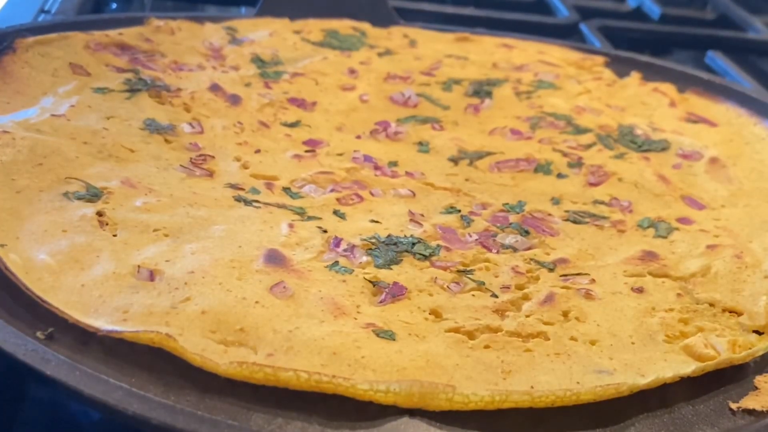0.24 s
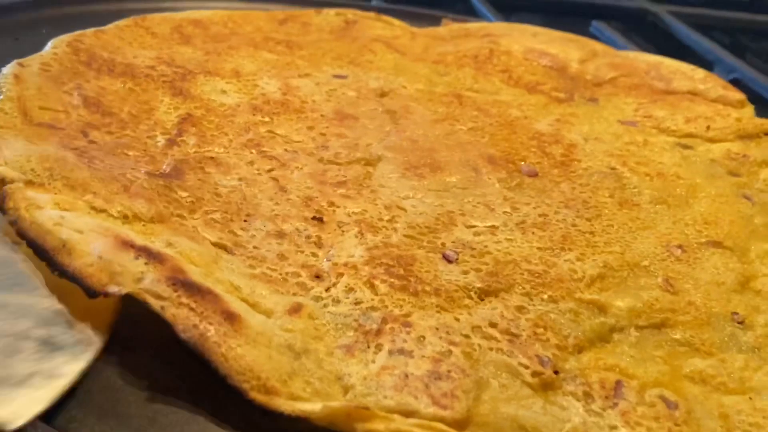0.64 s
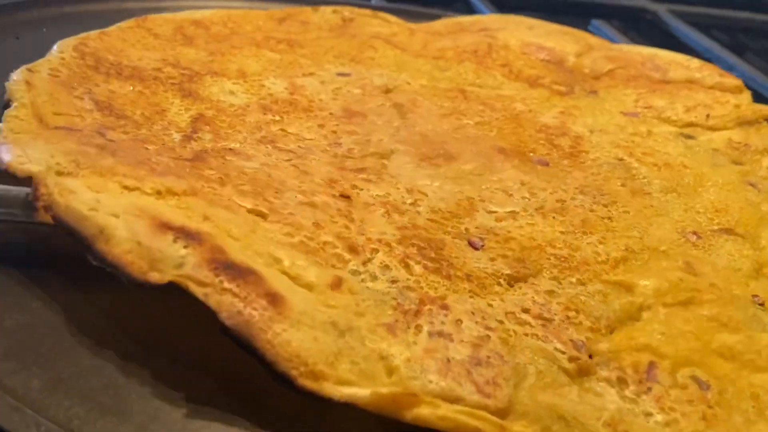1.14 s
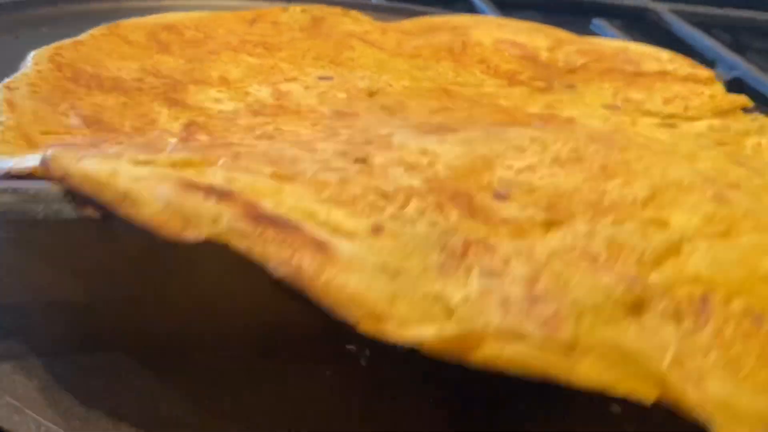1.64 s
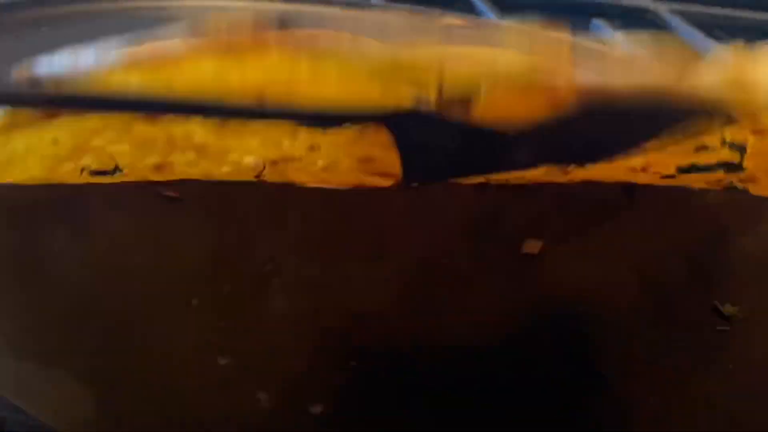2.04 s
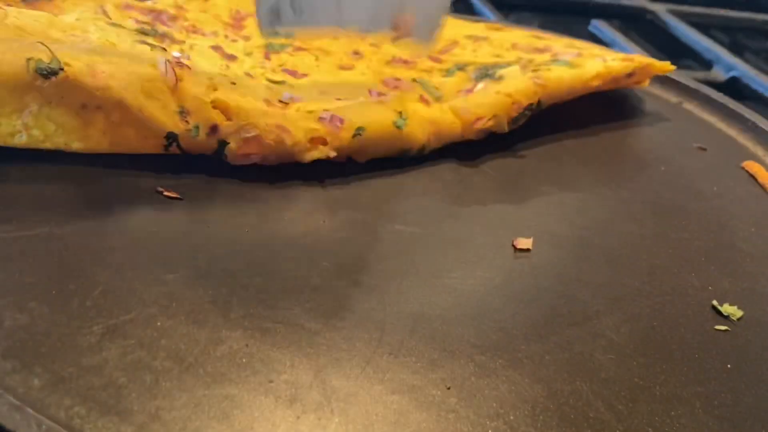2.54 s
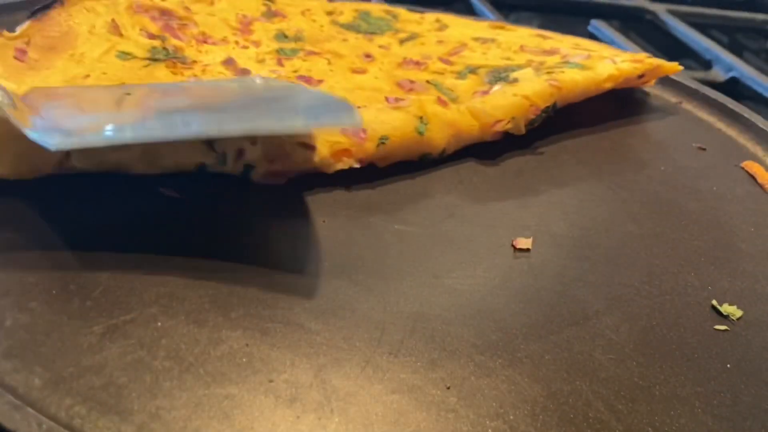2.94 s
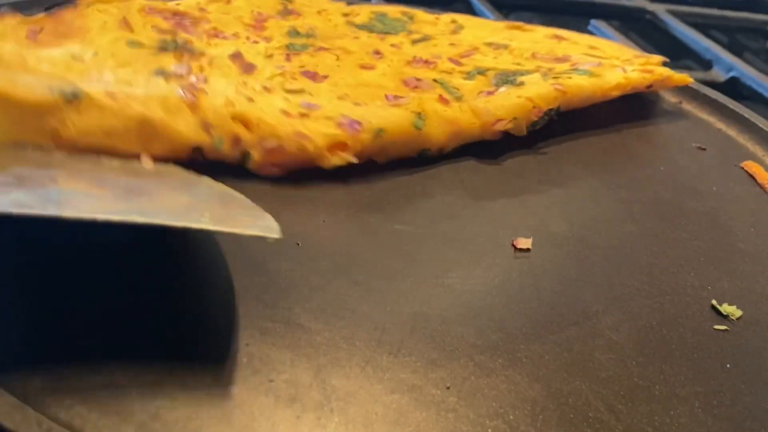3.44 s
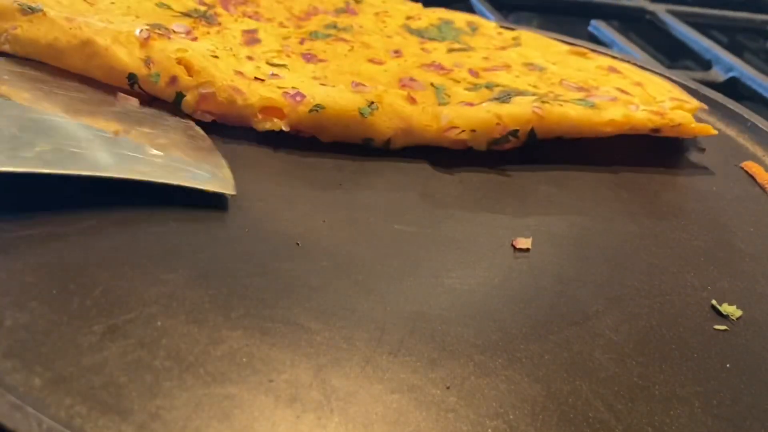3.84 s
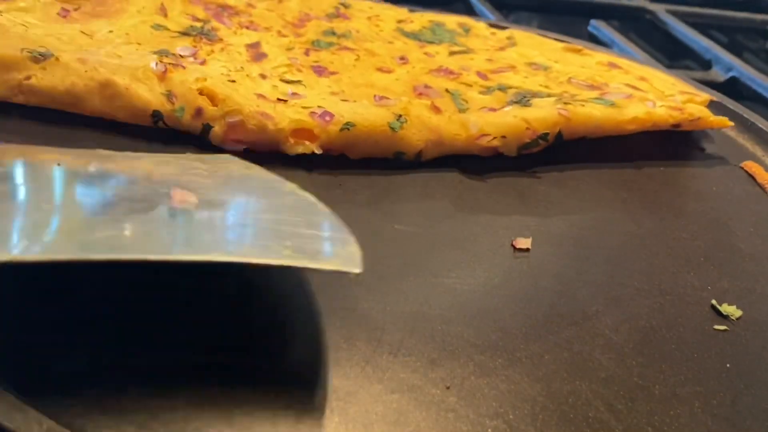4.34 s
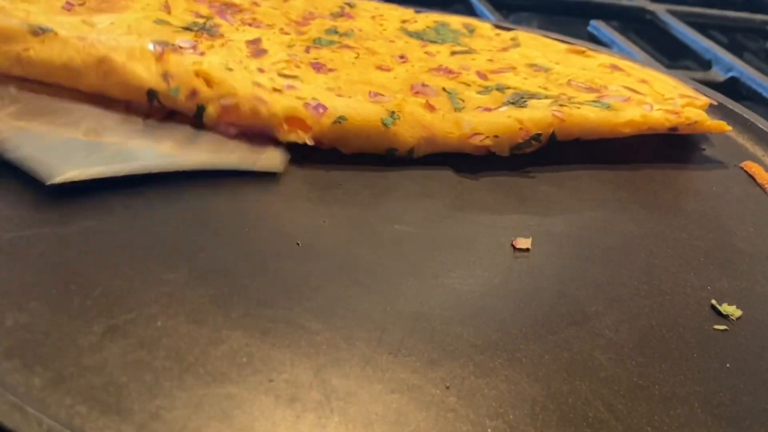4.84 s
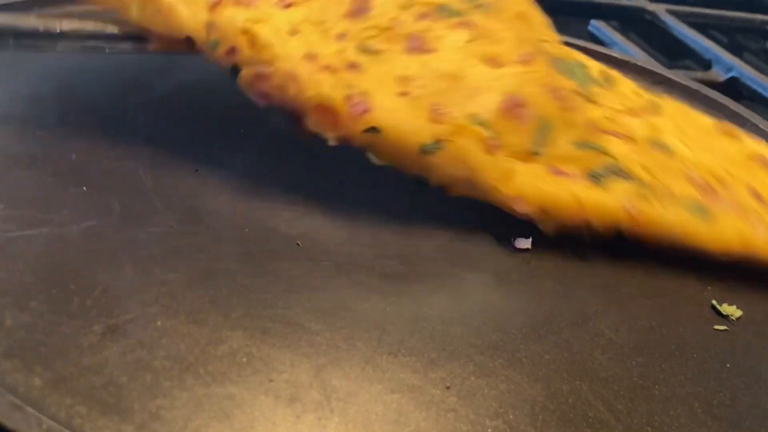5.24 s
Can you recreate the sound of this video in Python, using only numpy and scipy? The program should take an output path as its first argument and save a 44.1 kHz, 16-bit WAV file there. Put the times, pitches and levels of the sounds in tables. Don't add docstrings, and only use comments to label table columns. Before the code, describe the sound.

A low kitchen rumble with fan hum and airy flame hiss opens the scene, then a dull handling bump and crisp crackly snaps. A steel spatula scrapes under a flatbread on a flat pan, ticking lightly. A brief squeal follows a hard ringing slap past the middle; a second, drier slap leads into busy scraping. Close stereo phone-like microphone, small dry kitchen.

```python
import sys
import numpy as np
from scipy import signal
from scipy.fft import rfft, irfft, next_fast_len
from scipy.io import wavfile
from scipy.ndimage import uniform_filter1d

SR = 44100
rng = np.random.default_rng(int(sys.argv[2]) if len(sys.argv) > 2 else 0)


def int16_out(signal):
    q = np.round(np.clip(np.atleast_2d(signal).T, -1, 1) * 32767)
    wavfile.write(sys.argv[1], SR, q.astype(np.int16))


def gain_from_db(level_db):
    decades = np.asarray(level_db, float) / 20
    return 10 ** decades


N = 242550

# (frequency [Hz], level [dB per Hz])
RUMBLE_COLOUR = [(27.5, -29), (31.5, -3.5), (40, -1.5), (50, -2), (100, -3), (140, -12.5), (200, -41.5)]
# (time [s], half width [s], change [dB])
RUMBLE_SURGES = [
    (.44, 0.029, -0.5),
    (.64, 0.053, 14),
    (.8, 0.2, -21),
    (1.15, 0.12, 0),
    (1.399, 0.18, 4.5),
    (2.358, 0.045, 6.5),
    (2.9, 0.056, 3),
    (4.01, 0.022, -12),
    (5.35, 0.096, -4),
]
# (frequency [Hz], level [dB per Hz])
AIR_COLOUR = [(80, -17.5), (130, -3.5), (250, -7.5), (340, -9), (420, -8.5), (600, -20), (800, -24.5),
              (1000, -27.5), (2000, -39), (4000, -67), (7500, -37), (9000, -27.5), (12000, -43.5),
              (16000, -67)]
# (frequency [Hz], width [Hz], level [dB])
FAN_TONES = [(38, 5, -46), (164, 7, -52), (327, 6, -55.5), (355, 3, -56.5), (436, 8, -66), (102, 12, -51)]
# (time [s], half width [s], depth [dB])
SCENE_CHANGE = (0.359, 0.011, -26)

# (time [s], level [dB])
JOLT = [
    (0.365, -57),
    (0.371, -39),
    (.385, -26),
    (.397, -30),
    (0.42, -22.5),
    (.442, -29.5),
    (0.473, -42),
    (0.5, -27.5),
    (0.535, -50),
]
# (frequency [Hz], level [dB per Hz])
SHAKE_COLOUR = [(60, -0.5), (120, 1.0), (300, -12), (450, -13.0), (600, -40), (1000, -37), (1500, -54.5)]
# (time [s], level [dB], frequency [Hz], half length [s])
KNOCK = (.4115, -19, 255, .0026)

# (time [s], peak [dB], centre [Hz])
SNAPS = [(.5095, -22, 5000), (.5152, -22, 6500), (.5627, -17.5, 6000), (.5838, -24, 5500),
         (1.5015, -42, 7000), (1.5992, -33, 3000), (1.5992, -33, 6800), (1.4215, -38, 7500),
         (2.2524, -28, 3500), (2.2855, -27, 3000), (2.7515, -29, 2500), (2.7895, -30, 4000),
         (.7245, -35, 5500), (1.6062, -36, 6500), (.6815, -31, 7000), (.7357, -29, 5000),
         (4.6926, -34, 4000), (5.0735, -42, 6000), (5.0765, -40, 7000)]
# (time [s], length [s], from [Hz], to [Hz], level [dB])
GLIDES = [
    (0.61, 0.067, 800, 1020, -44),
    (4.72, 0.21, 630, 1410, -52),
    (4.8, 0.11, 5300, 4600, -48),
    (5.1, 0.061, 830, 480, -60),
    (4.797, 0.2, 2590, 2800, -55),
]
# (time [s], frequency [Hz], level [dB])
SQUEAL = [
    (3.32, 1366, -61),
    (3.37, 1361, -46),
    (3.395, 1360, -49),
    (3.41, 1362, -41),
    (3.43, 1370, -39),
    (3.452, 1386, -32.5),
    (3.462, 1386, -35),
    (3.469, 1380, -45),
    (3.481, 1375, -39),
    (3.492, 1370, -56),
]
# (time [s], length [s], frequency [Hz], level [dB])
SINGS = [(.43, .1, 720, -52), (.59, .12, 725, -47), (.61, .05, 1370, -51), (.635, .014, 3210, -41),
         (.645, .04, 920, -52), (.85, .04, 4850, -48), (1.15, .1, 915, -57), (1.33, .07, 720, -50),
         (1.44, .09, 722, -59), (1.655, .015, 920, -51), (1.662, .015, 1300, -56), (2.305, .04, 2170, -46),
         (2.32, .06, 1400, -49), (3.542, .012, 4830, -45), (3.87, .06, 4840, -53), (3.875, .025, 2980, -47),
         (3.877, .018, 1745, -49), (3.872, .02, 3830, -50), (3.878, .02, 7110, -49),
         (3.935, .04, 3230, -51), (3.98, .12, 2480, -62), (3.89, .06, 1378, -54), (4.755, .04, 4060, -46),
         (4.74, .06, 2990, -47), (4.78, .1, 715, -48), (4.815, .025, 921, -42), (4.88, .04, 1950, -49),
         (4.94, .07, 1400, -50), (1.14, .08, 715, -58), (2.43, .08, 730, -59), (2.6, .12, 738, -63),
         (3.95, .1, 725, -61), (4.2, .16, 733, -63), (4.23, .04, 1030, -61), (4.22, .05, 1380, -61),
         (5.05, .06, 690, -56), (5.27, .04, 1180, -58), (4.89, .04, 1050, -48)]
# (time [s], length [s], frequency [Hz], level [dB])
CATCHES = [(0.524, 0.031, 3300, -49), (0.54, 0.022, 6640, -49), (0.59, .05, 4062, -51),
           (0.575, 0.044, 3300, -52), (0.56, .03, 7016, -58), (.625, 0.064, 1500, -50),
           (0.824, 0.063, 910, -54), (0.813, 0.027, 1380, -48), (.82, 0.059, 2100, -50),
           (0.827, .03, 2690, -51), (0.897, .03, 1850, -47), (.96, 0.035, 3600, -50),
           (0.997, .05, 715, -60), (1.284, 0.062, 925, -54), (2.29, .03, 700, -49.5),
           (2.318, 0.033, 95, -29), (2.335, .025, 91, -30), (2.382, .03, 113.4, -34.5),
           (3.375, .05, 1700, -43), (3.376, 0.039, 3821, -51), (3.381, .05, 2597, -49),
           (3.43, .04, 3200, -52), (3.43, 0.055, 3819, -48.5), (3.455, 0.031, 2780, -46),
           (3.46, 0.043, 3010, -50), (3.455, .03, 2800, -50), (3.45, .03, 5600, -50),
           (3.466, 0.046, 680, -50), (3.543, 0.036, 2700, -55), (3.87, .04, 5900, -60),
           (3.875, 0.035, 2482, -55), (3.87, .03, 3198, -54), (3.92, .06, 4510, -58),
           (3.935, .04, 1774, -58), (3.912, 0.085, 1020, -62.5), (4.727, 0.042, 1750, -48),
           (4.71, 0.038, 2800, -52.5), (4.73, 0.052, 3869, -45), (4.72, 0.033, 6812, -56),
           (4.748, 0.034, 3600, -48), (4.758, .04, 6575, -52), (4.761, .05, 7068, -53),
           (4.874, 0.063, 740, -47), (4.883, 0.032, 2476, -49), (4.89, 0.038, 2664, -47),
           (4.873, 0.026, 3283, -45), (4.86, 0.074, 4900, -54), (4.909, .035, 4200, -47),
           (4.914, 0.036, 4581, -49.5), (5.003, .02, 1410, -53)]

# (time [s], ring level [dB])
RUNG_TAPS = [
    (1.2620, -37),
    (2.2860, -33),
    (1.5180, -51),
]
# (frequency [Hz], level [dB], t60 [s])
EDGE_RING = [(710, -4, 0.16), (1090, -11, 0.16), (1220, -9, .1), (1530, -10, 0.18), (2255, 2.5, 0.065),
             (2500, -4, .087), (2670, -11, .06), (3100, -14, 0.13), (3550, -16, .1)]
PRESS_RING = [(694, -6, 0.075), (960, -11, .12), (1380, -18, 0.22), (2166, 1, .08), (2480, -3.5, 0.12),
              (3306, -15, .05), (3730, -12, .05), (4400, -27, .05)]
TICK_RING = [(1720, 1, .13), (2420, -3, .04), (2950, -4, .05), (4050, -3, .05), (4447, -3, .09),
             (5566, 1, .1), (6638, 4, .05), (7600, -6, .03)]
# (time [s], peak [dB], centre [Hz], rattle t60 [s], spread [octaves])
TAPS = [(0.5095, -35, 5550, 0.034, 1.7), (0.5169, -28.5, 6070, 0.08, 0.68), (1.2595, -30, 2020, 0.23, 1.3),
        (1.4122, -43, 7200, 0.014, 0.7), (1.4215, -46, 6000, 0.034, 0.64), (1.518, -36.5, 4000, 0.11, 2.1),
        (2.037, -35, 4900, 0.014, 2.3), (2.11, -54, 7100, .05, 0.96), (2.148, -35.5, 2500, 0.2, 0.79),
        (2.2041, -34, 2500, 0.09, 1.8), (2.2524, -28.5, 3150, 0.16, 2.3), (2.285, -27.5, 2300, 0.18, 2.2),
        (2.751, -32, 2740, 0.14, 2.3), (2.7893, -29.5, 4000, 0.058, 2.7), (3.017, -41, 3450, 0.029, 1.4),
        (3.273, -32.5, 3470, 0.3, 0.92), (0.7054, -36, 5500, 0.023, 0.51), (1.0578, -48, 5000, .02, 0.87),
        (4.31, -44, 9004, .015, 1)]
# (distance [spreads], level [dB])
RATTLE = [(-3, -24), (-1.5, -13.5), (0, 0), (2.5, -37), (3, -54)]
# (frequency [Hz], level [dB per Hz])
TICK_COLOUR = [(500, -20), (1500, 0), (8000, -2), (16000, -12)]

# (time [s], peak [dB], chatter [s], rattle t60 [s], ring level [dB])
BLOWS = [
    (3.2794, -14, 0.017, 0.052, -17.5),
    (4.5997, -14.5, 0.014, 0.046, -27.5),
]
# (frequency [Hz], level [dB per Hz])
BLOW_COLOURS = [
    [(200, -6.5), (600, -6), (1200, -0.5), (2200, -7.5), (3200, -2.5), (5200, 1), (7500, -2.5), (8800, 6.5),
     (11000, -4), (13200, -1), (16500, -14), (17000, -51)],
    [(200, -1.5), (600, -21), (1300, 1), (2250, -20.5), (2700, 6), (4050, -5), (4250, -30), (4500, 0),
     (5000, 0.5), (7300, 0.5), (8800, 7), (11000, 0), (13200, 2), (16500, -3), (17000, -55.5)],
]
# (frequency [Hz], level [dB], t60 [s])
BLOW_RINGS = [
    [(732, -20, .8), (1125, -11, .3), (1370, -15, .3), (1814, -15, .2), (2588, -17, .45), (3079, -15, .2),
     (3844, -5, .07), (1614, -10, .12), (4053, -5, .25), (4670, 0, .06), (5180, 7, .05), (5632, 3, .18),
     (6314, -5, .15), (6995, -9, .2), (7752, 1, .05), (7052, 0, .05), (10630, -22, .3)],
    [(614, -6, .25), (732, -12, .5), (1125, -3, .23), (1385, -10, .3), (1178, -5, .2), (1835, 0, .09),
     (2176, -8, .3), (2550, -7, .3), (2990, -4, .15), (3509, -4, .25), (3800, 9, .12), (3822, 2, .22),
     (4059, -10, .15), (5610, 0, .1), (6070, 2, .06), (4797, -3, .1), (7036, -3, .12), (7570, 0, .16),
     (10630, -10, .15)],
]
# (frequency [Hz], level [dB], t60 [s])
CROSSED_MODES = [(1930, -5, 0.13), (2600, -29, 0.3), (2880, -12, .24)]

# (time of full pressure [s], rise [s], release [s], pressure [dB], 1-2 kHz share [dB])
STROKES = [(.52, 0.0056, 0.091, -59, -7), (.565, 0.063, 0.14, -39.5, -5.5), (.64, 0.1, 0.021, -48.5, -3),
           (.82, 0.18, 0.086, -42.5, -9), (.89, 0.079, 0.087, -43.5, -5), (.96, .08, 0.17, -48, -4.5),
           (1.101, 0.63, 0.17, -54, 10), (1.33, 0.073, 0.06, -58, -3), (1.6, 0.073, 0.75, -56, 2),
           (1.97, 0.32, 0.8, -55, -14), (2.12, 0.033, 0.1, -40, -30), (2.5, 0.073, 0.17, -67, -5),
           (2.85, 0.15, 0.25, -51, -21), (2.95, 0.072, 0.05, -53.5, 5), (3.33, 0.055, 0.18, -39.5, -3),
           (3.455, 0.063, 0.067, -40, -5), (3.545, 0.049, 0.059, -45, -3), (3.679, 0.19, 0.077, -56, -3),
           (3.882, 0.087, 0.19, -47, -8.5), (4.216, 0.11, 0.057, -51.5, -10),
           (4.649, 0.046, 0.065, -40.5, 3), (4.73, 0.072, 0.25, -38.5, -11.5),
           (4.9, 0.15, 0.13, -40.5, -1.5), (5.085, 0.041, 0.33, -51, 0.5), (5.21, 0.15, 0.054, -45, -17),
           (5.289, 0.072, 0.027, -50, -12.5)]
# (frequency [Hz], level [dB per Hz])
GRIT_COLOUR = [(300, -9), (700, -1.5), (1200, 3.5), (2500, 1.5), (3500, 1), (5000, 2), (7500, 3.5),
               (9000, 3.5), (11000, 1.5), (13200, -4), (16000, -1)]
# (frequency [Hz], width [Hz], level [dB])
METAL = [(730, 20, -6), (915, 30, -8), (1378, 30, -4), (1780, 45, -3), (2480, 40, -3), (2990, 45, 0),
         (3220, 45, -2), (3540, 35, -3), (3810, 45, 0), (4060, 30, 0), (4630, 55, -6), (4800, 45, -3),
         (5190, 55, -3), (5880, 50, -4), (7040, 50, -4), (7750, 60, -3)]

# (frequency [Hz], likeness [0-1], left minus right [dB], right's lead [radians])
PORTS = [(58.5, 1, 0, 0.18), (163, 1, 0.5, 0.66), (326, 0.91, 2, 0.5), (678, 0.31, -7, -0.14),
         (1110, 0.16, 0, 0), (2500, 0.28, 3, -0.37), (4000, 1, 2, -1.28), (5800, 0.041, 4, 1.5),
         (6260, 0.6, 2, -6.5)]

QUADRATURE = np.array([[0], [np.pi / 2]])


def evened(x):
    return x / np.sqrt(np.mean(x ** 2) + 1e-20)


def read(points, hz, order=1):
    columns = np.transpose(points)
    return np.interp(np.log(hz + 1), np.log(columns[0] + 1), columns[order])


def curves(rows):
    s, *columns = np.transpose(rows)
    return [np.interp(np.arange(N) / SR, s, c) for c in columns]


def add(mix, s, sound):
    part = mix[..., round(s * SR):][..., :sound.shape[-1]]
    part += sound[..., :part.shape[-1]]


def coloured(x, points):
    length = x.shape[-1]
    size = next_fast_len(length)
    gain = gain_from_db(read(points, np.fft.rfftfreq(size, 1 / SR)))
    return evened(irfft(rfft(x, size) * gain, size)[..., :length])


def resonate(x, hz, width):
    r = np.exp(-np.pi * width / SR)
    turn = 2 * np.pi * hz / SR
    return signal.lfilter([1 - r], [1, -2 * r * np.cos(turn), r * r], x) * np.sin(turn)


def drift(rate, db):
    size = round(N / SR * rate) + 3
    return np.interp(np.linspace(0, size - 1, N), np.arange(size), gain_from_db(db * rng.standard_normal(size)))


def patchy(x, db):
    z = signal.stft(x, nperseg=512)[2]
    spots = rng.standard_normal(z.shape[1:])
    spots = uniform_filter1d(uniform_filter1d(spots, 7, axis=1), 4, axis=0)
    return evened(signal.istft(z * gain_from_db(db * evened(spots)), nperseg=512)[1][:, :N])


def dying_notes(modes, t):
    notes = 0
    for hz, db, t60 in modes:
        turn = 2 * np.pi * (hz * t + rng.random()) + QUADRATURE
        notes = notes + gain_from_db(db - 60 * t / t60) * np.sin(turn)
    return notes


def kitchen():
    t = np.arange(N) / SR
    surge_db = sum(db * np.exp(-((t - s) / half) ** 2) for s, half, db in RUMBLE_SURGES)
    rumble = gain_from_db(-42 + surge_db) * coloured(rng.standard_normal((2, N)), RUMBLE_COLOUR)
    air_db = -51.5 - 1 * (t < SCENE_CHANGE[0])
    air = gain_from_db(air_db) * coloured(rng.standard_normal((2, N)), AIR_COLOUR)
    fan = 0
    for hz, width, db in FAN_TONES:
        hum = resonate(resonate(rng.standard_normal((2, N)), hz, width), hz, 3 * width)
        fan = fan + gain_from_db(db) * drift(4, db=2.0) * evened(hum)
    return rumble + air + fan


def jolt():
    t = np.arange(N) / SR
    on = (t > JOLT[0][0]) & (t < JOLT[-1][0])
    shake = coloured(rng.standard_normal(N), SHAKE_COLOUR)
    s, db, hz, half = KNOCK
    knock = -gain_from_db(db) * np.sin(2 * np.pi * hz * (t - s)) * np.exp(-((t - s) / half) ** 2 / 2)
    return gain_from_db(curves(JOLT)[0] - 2.0) * on * shake + knock


def room(x, t60):
    t = np.arange(SR // 2) / SR
    echoes = rng.standard_normal((2, len(t))) * gain_from_db(-60 * t / t60) * (t > .004)
    return signal.oaconvolve(x, echoes / np.linalg.norm(echoes[0]), axes=1)[:, :N]


def snaps():
    out, t = np.zeros((2, N)), np.arange(200) / SR
    for s, db, hz in SNAPS:
        decay = np.exp(-t * hz / 1.3)
        add(out, s, gain_from_db(db) * np.sin(2 * np.pi * hz * t + QUADRATURE) * decay)
    return out


def glides():
    out = np.zeros((2, N))
    for s, length, from_hz, to_hz, db in GLIDES:
        size = round(length * SR)
        flutter = evened(uniform_filter1d(rng.standard_normal((2, 2, SR // 2)), 500))[..., :size]
        turn = 2 * np.pi * np.cumsum(np.geomspace(from_hz, to_hz, size)) / SR
        note = flutter[0] * np.cos(turn) + flutter[1] * np.sin(turn)
        add(out, s, gain_from_db(db) * note * signal.windows.tukey(size, .5))
    return out


def squeal():
    hz, db = curves(SQUEAL)
    t = np.arange(N) / SR
    on = (t > SQUEAL[0][0]) & (t < SQUEAL[-1][0])
    tone = np.sin(2 * np.pi * np.cumsum(hz) / SR + QUADRATURE)
    return np.sqrt(2) * on * gain_from_db(db) * drift(120, db=3.0) * tone


def sings():
    out = np.zeros((2, N))
    for s, length, hz, db in SINGS + CATCHES:
        size = round(length * 2.3 * SR)
        waver = evened(uniform_filter1d(rng.standard_normal(SR // 2), 400))[:size]
        slips = evened(uniform_filter1d(rng.standard_normal(SR // 2), round(4 * SR / hz) + 150))
        grip = evened(gain_from_db(3.5 * slips)[:size])
        turn = 2 * np.pi * np.cumsum(hz * (1 + .0025 * waver)) / SR
        tone = np.sqrt(2) * np.sin(turn + QUADRATURE)
        add(out, s - size / 2 / SR, gain_from_db(db) * tone * grip * np.hanning(size))
    return out


def tap_rings():
    out, t = np.zeros((2, N)), np.arange(SR // 4) / SR
    for (s, db), modes in zip(RUNG_TAPS, [EDGE_RING, PRESS_RING, TICK_RING]):
        add(out, s, gain_from_db(db) * dying_notes(modes, t) * np.minimum(t / .001, 1))
    return out


def taps():
    out, t = np.zeros((2, N)), np.arange(6000) / SR
    impulse = 1. * (t == 0)
    metal = sum(gain_from_db(db) * resonate(impulse, hz, width) for hz, width, db in METAL)[None]
    metal = metal / np.linalg.norm(metal)
    for s, db, hz, t60, spread in TAPS:
        noise = rng.standard_normal((2, len(t)))
        band = np.array([(hz * 2 ** (k * spread), band_db) for k, band_db in RATTLE])
        fade_s = max(t60, .004)
        tick = coloured(noise, TICK_COLOUR) * np.exp(-t / .0007)
        rattle = .5 * coloured(noise, band) * gain_from_db(-60 * t / fade_s)
        lows = 0.084 * coloured(noise, band * [.45, 1]) * gain_from_db(-35 * t / fade_s)
        ring = gain_from_db(-32) * signal.fftconvolve(rattle, metal, axes=1)[:, :len(t)]
        onset = np.minimum(t / .0002, 1)
        add(out, s, gain_from_db(db - 3.0) * (.8 * tick + rattle + lows + ring) * onset)
    return out


def blows():
    out, t = np.zeros((2, N)), np.arange(SR // 2) / SR
    high = signal.butter(2, 8000, "high", fs=SR, output="sos")
    for (s, db, chatter, t60, ring_db), colour, modes in zip(BLOWS, BLOW_COLOURS, BLOW_RINGS):
        land = .55 * np.exp(-t / 0.0079) * 1.95 + np.clip((t - .006) / 0.00061, 0, 1)
        shape = np.minimum(t / 0.00042, 1) * land * gain_from_db(-60 * np.maximum(t - chatter, 0) / t60)
        contact = gain_from_db(2.0 * evened(uniform_filter1d(rng.standard_normal(len(t)), 60)))
        noise = coloured(rng.standard_normal((2, len(t))), colour)
        treble = signal.sosfilt(high, noise)
        treble_fade = gain_from_db(-60 * 0.45 * np.maximum(t - 0.33 * chatter, 0) / t60)
        noise = noise - treble * (1 - treble_fade)
        clang = 0
        for k, (hz, mode_db, _) in enumerate(modes):
            clang = clang + (-1) ** k * gain_from_db(.5 * mode_db) * resonate(noise, hz, width=60)
        slap = gain_from_db(db) * shape * (0.88 * contact * noise + gain_from_db(-10) * evened(clang))
        ring = gain_from_db(ring_db) * dying_notes(modes, t)
        crossed = sum(gain_from_db(db + mode_db - 60 * t / mode_t60) * np.sin(2 * np.pi * hz * t)
                      for hz, mode_db, mode_t60 in CROSSED_MODES) * [[1], [-1]]
        thump = gain_from_db(-33 - 60 * t / 0.18) * np.sin(2 * np.pi * 175 * t)
        add(out, s, slap + (ring + crossed) * np.minimum(t / 0.0037, 1) + thump)
    return out


def hand():
    t = np.arange(N) / SR
    s, rise, release, db, share_db = np.transpose(STROKES)[..., None]
    away = np.where(t < s, (s - t) / rise, (t - s) / release)
    power = gain_from_db(2 * (db - 16 * away ** 1.74))
    rest = gain_from_db(2 * -79)
    total = power.sum(0) + rest
    pressure_db = 10 * np.log10(total)
    share_db = ((power * share_db).sum(0) + rest * 5) / total
    ring_db = -9 + 0.3 * (pressure_db + 51.0) + 0.57 * np.minimum(share_db + 13.5, 0)
    return pressure_db, share_db, ring_db


def scrape():
    pressure_db, share_db, ring_db = hand()
    grains = gain_from_db(2.7 * np.minimum(rng.exponential(1, N), 5))
    grit = rng.standard_normal((2, N)) * grains * drift(150, db=1.5)
    bright = np.clip(-(share_db + 5.0) / 9, -.9, .9)
    rasp = patchy(coloured(grit, GRIT_COLOUR), db=1.5)
    low = signal.sosfilt(signal.butter(1, 3000, fs=SR, output="sos"), rasp)
    rasp = (1 - bright) * evened(low) + (1 + bright) * evened(rasp - low)
    rasp = rasp / np.sqrt(2 + 2 * bright ** 2)
    ring = 0
    for hz, width, db in METAL:
        ring = ring + gain_from_db(db) * evened(resonate(grit * drift(60, db=4.0), hz, 1.2 * width))
    start = np.arange(N) > .5088 * SR
    return gain_from_db(pressure_db + 0.5) * start * (rasp + gain_from_db(ring_db) * evened(ring))


def scene():
    near = scrape() + sings() + squeal() + glides() + taps() + blows() + tap_rings() + snaps()
    s, half, db = SCENE_CHANGE
    fade = gain_from_db(db * np.exp(-((np.arange(N) / SR - s) / half) ** 2))
    return (kitchen() + near + gain_from_db(-15.5) * room(near, 0.1) + jolt()) * fade


def kept(share, weak):
    return .04 + .96 / (1 + (weak / (share + 1e-6)) ** 12)


def low_pass(x):
    return signal.sosfilt(signal.butter(12, 17150, fs=SR, output="sos"), x)


def record(dry):
    size = next_fast_len(N)
    hz = np.fft.rfftfreq(size, 1 / SR)
    rounded = 1.1 * np.tanh(dry / 1.1)
    top_edge = .008 + .992 / (1 + (hz / 15850) ** 300)
    low_cut = 1 + (30.5 / (hz + 1)) ** 12
    one, other = rfft(rounded, size) * top_edge / low_cut

    same = np.clip(read(PORTS, hz, order=1), 0, 1)
    treble = hz > 6000
    lead = np.where(treble, 2 * np.pi * (hz - 6850) / 4270, read(PORTS, hz, order=3))
    half = gain_from_db(read(PORTS, hz, order=2) / 2 * np.clip((8500 - hz) / 2000, 0, 1))
    left = one * half
    right = (same * one * np.exp(1j * lead) + np.sqrt(1 - same ** 2) * other) / half

    apart = abs(np.tan(lead / 2))
    grow = (hz / 9000) ** .7

    def thinned(x, share, weak):
        return irfft(x / 2 * np.where(treble, kept(share, weak * grow), 1), size)[:N]

    narrow = thinned(left + right, 1 / (apart + 1e-6), .32)
    wide = thinned(left + right, 1 / (apart + 1e-6), .47)
    side = thinned(left - right, apart, .5)
    jump = np.repeat(1. * (rng.random(N // 3072 + 1) < .6), 3072)[:N]
    mid = narrow + uniform_filter1d(jump, 1024) * (wide - narrow)
    return low_pass(np.array([mid + side, mid - side]))


dry = scene()
out = record(dry)
int16_out(out)
```